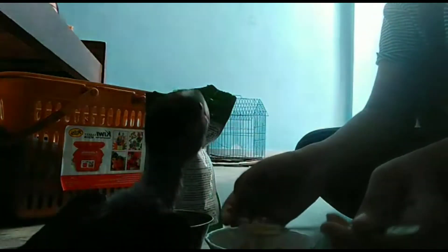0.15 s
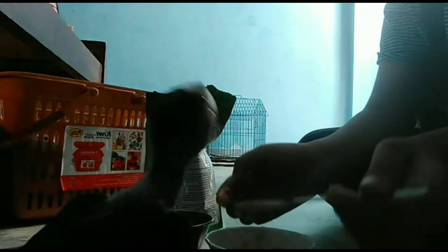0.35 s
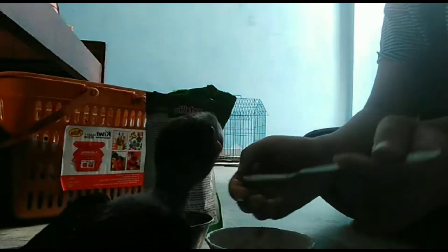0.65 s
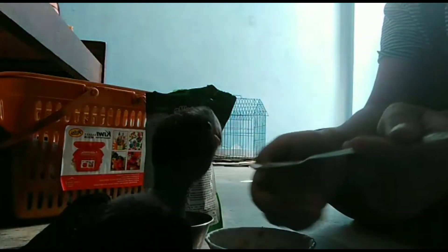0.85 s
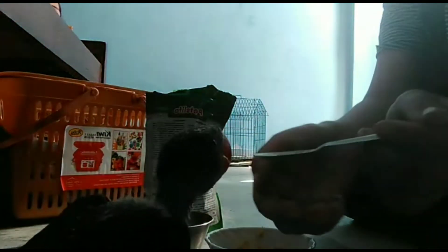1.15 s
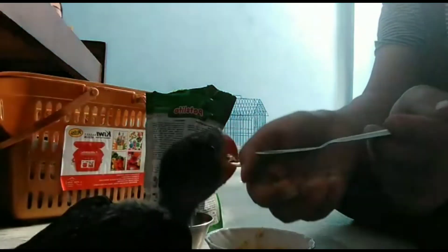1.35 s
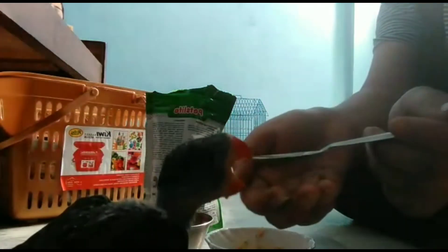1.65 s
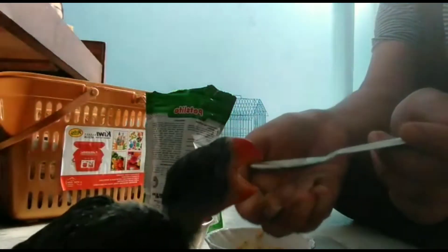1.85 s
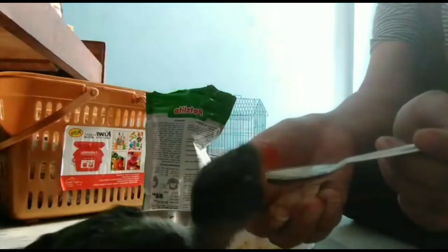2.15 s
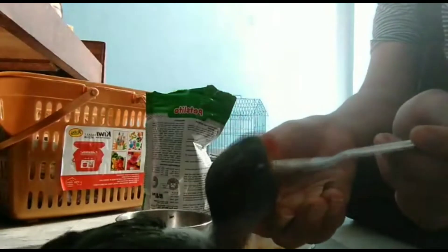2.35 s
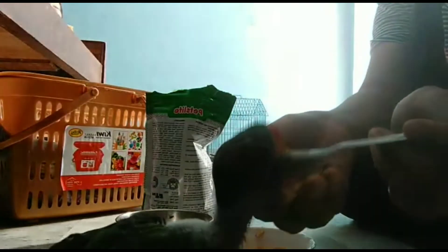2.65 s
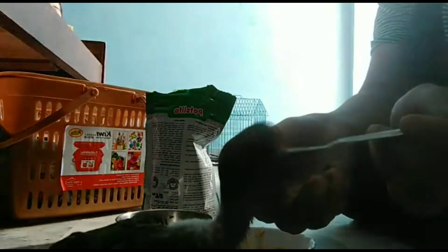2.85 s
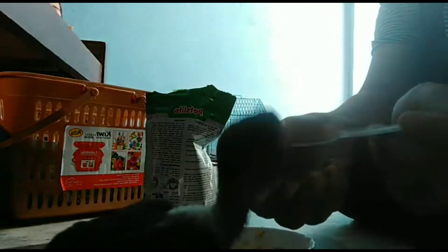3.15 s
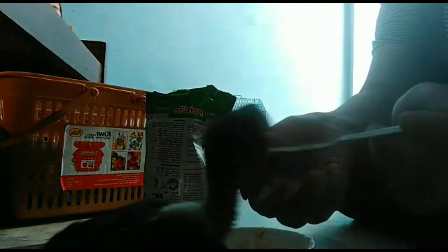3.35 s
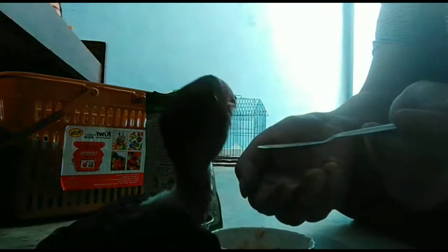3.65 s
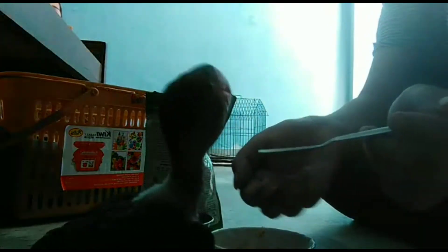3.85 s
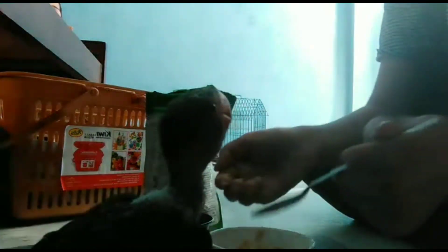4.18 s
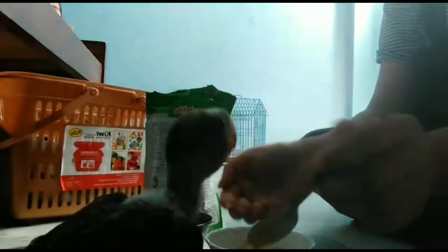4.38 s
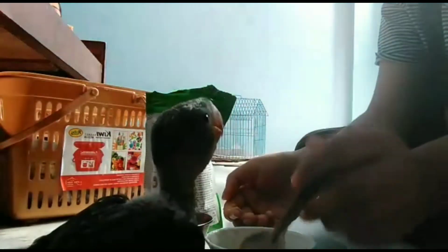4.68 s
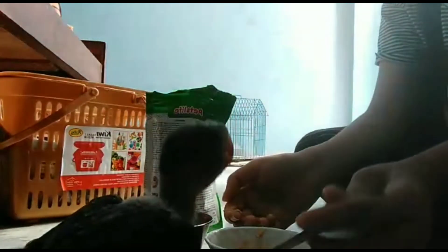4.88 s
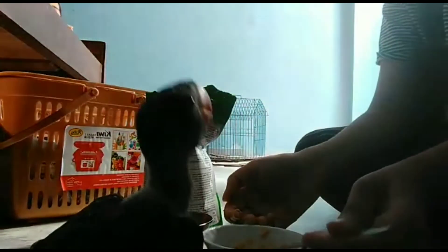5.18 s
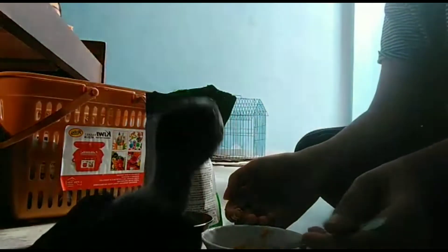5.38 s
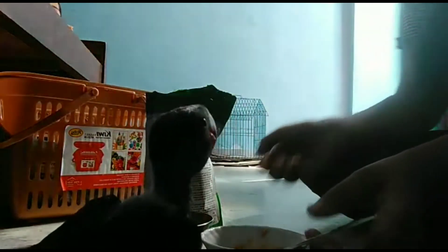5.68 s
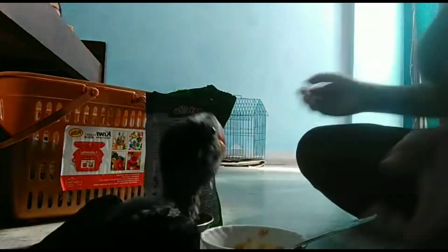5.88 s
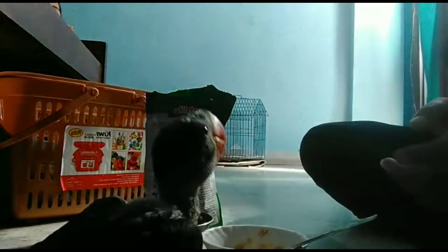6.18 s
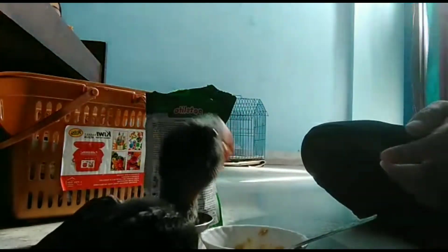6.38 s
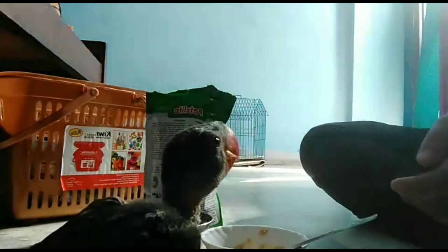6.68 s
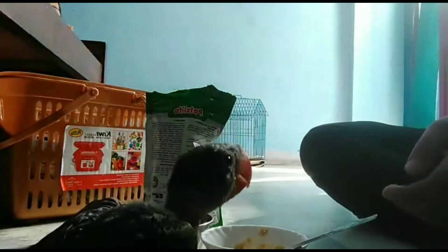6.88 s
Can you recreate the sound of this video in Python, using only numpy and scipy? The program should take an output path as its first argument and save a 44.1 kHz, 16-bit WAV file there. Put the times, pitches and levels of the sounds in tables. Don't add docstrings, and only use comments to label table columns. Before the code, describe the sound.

Hungry baby parrot squawks harshly at close range as a spoon clicks on its beak and rattles in a bowl, draught thumping the microphone.

```python
import sys
import numpy as np
from scipy import signal
from scipy.fft import rfft, irfft, next_fast_len
from scipy.io import wavfile
from scipy.ndimage import minimum_filter1d

SR = 44100
rng = np.random.default_rng(int(sys.argv[2]) if len(sys.argv) > 2 else 0)


def volts_from_decibels(level):
    exponent = np.asarray(level, float) / 20
    return 10 ** exponent


def wav_out(sig):
    wavfile.write(sys.argv[1], SR, np.round(np.clip(np.atleast_2d(sig).T, -1, 1) * 32767).astype(np.int16))


N = 310009

# time_s, pitch_hz
GLIDES = [
    [(0.0, 1064), (0.034, 1020), (0.06, 945), (0.075, 880)],
    [(1.69, 1350), (1.706, 1500), (1.722, 1601), (1.774, 1720), (1.849, 1581), (1.915, 1325), (1.945, 1223),
     (2.015, 1084), (2.07, 875)],
    [(5.158, 1350), (5.175, 1490), (5.189, 1556), (5.251, 1640), (5.302, 1546), (5.351, 1427),
     (5.425, 1191), (5.493, 1061), (5.54, 823)],
]
# end_s, deepest_dip_s
SQUAWK_TIMES = [(0.075, -0.09), (2.072, 1.903), (5.541, 5.382)]
# strength_db, hoarseness_db, brightness_db_per_octave, background_loss_db, hold_after_end_s
SQUAWKS = [
    (-0.5, 5, 0.9, -7, 0.01),
    (0.14, -3, 0.34, -25, 0.32),
    (-0.3, 1.5, -0.4, -14, 0.02),
]
# time_from_end_s, level_db, breath_re_tone_db, brightness_db_per_octave
EFFORT = [(-0.383, -36, -4, -9), (-0.374, -22.5, -12, -9), (-0.36, -17.5, -22, -1.5),
          (-0.344, -14.3, -32, 0.6), (-0.225, -16, -37, 0.2), (-0.158, -23, -24, -0.4),
          (-0.024, -17.5, -24.5, -1.1), (-0.017, -26, -11, -5), (-0.006, -30, -7, -6)]
# freq_hz, gain_db
THROATS = [
    [(1250, -12), (2450, -16), (3700, -6), (4900, -3), (5450, -10), (5800, -23), (6400, -15), (6800, -20),
     (7600, 3), (8500, -9), (9500, -21), (11000, -29), (14000, -35)],
    [(900, -14), (1700, -9), (2300, -15), (3300, -5.5), (4100, -8), (4950, -2), (5600, -10), (6200, -2.5),
     (6900, -11), (7450, -32), (8350, -2), (9500, -16), (10300, -23), (11200, -19), (12300, -35),
     (14000, -27)],
    [(900, -13), (1600, -7), (2400, -16), (3200, -3), (4100, -6), (4850, -2), (5700, -17), (6300, -3),
     (7000, -24), (7950, 3), (8700, -5), (9500, -17), (10100, -34), (11400, -25), (12500, -32),
     (14500, -29)],
]
# time_s, depth_hz, rasp_db
CATCHES = [(0.064, 40, 6), (1.748, 14, 6), (1.857, 14, 9), (1.901, 30, 12), (1.982, 10, 5), (2.064, 45, 8),
           (5.222, 12, 6), (5.302, 58, 15), (5.268, 3, 10), (5.341, 10, 9), (5.382, 24, 11), (5.422, 6, 7)]
TREMOR_PERIOD_S, TREMOR_DEPTH_HZ = .041, 11
SHUDDER_DEPTH_HZ, SHUDDER_LEAD_S, SHUDDER_SPREAD_S = 31, .02, .04
SLIP_S, REGAIN_S = .004, .008
BEAK_OPEN_HZ, BEAK_TOP_HZ = 1630, 6000
BEAK_CLOSING_POWER = .41
TOP_CUT_HZ = 15800

# time_s, peak_db, bowl_share_db, spoon_share_db, crack_re_ring_db
TICKS = [(2.982, -33.5, -41, -2, -8), (3.065, -44, -16, -1, -16), (3.101, -46, -16, 0, -16),
         (3.107, -46, -16, 0, -16), (3.1144, -33, -32, -12, -20), (3.121, -46, -20, 0, -20),
         (3.205, -40, -21, -3.5, -6), (3.2915, -19.5, -24.5, -8.5, 12), (3.4235, -51, -17, -2, 0),
         (3.488, -16.5, -21, -13, 9), (4.9345, -39, 1.5, -7, -22), (4.9696, -34, -4, -25, -8),
         (5.1265, -35.5, 8.5, -14, -14.5), (5.682, -27, -1.5, -24, -12), (5.697, -34.5, 5, -10, -10),
         (5.7324, -27, -5, -10, -6), (5.7436, -16, -7, -22, -14), (5.7648, -26, -8, -11, 4),
         (6.0715, -38, -15, -20, 3)]
# freq_hz, level_db, t60_s
BOWL_MODES = [(1950, -4, .025), (3040, 0, 0.035), (2960, 0, 0.025), (4550, -12, 0.05), (5020, -13, 0.03),
              (5860, -8, .06), (7600, -3, 0.03), (7960, -6, .03)]
# freq_hz, level_db, t60_s
SPOON_MODES = [(8750, 0, .045), (9000, -4, .03), (9300, -6, .02), (11740, -7, .025), (13400, -9, .025),
               (15200, -14, .02)]
DULL_CRACK_HZ, BRIGHT_CRACK_HZ = (3200, 7000), (7200, 11000)
CRACK_EDGE_DB = -24

# peak_s, level_db,
# rise_s_per_20db, fall_s_per_20db, dull_part_db
RUSTLES = [(1.055, -72, .004, .15, 12), (1.082, -63, .004, .15, 8.5), (1.113, -47, .007, 0.0753, 1.5),
           (5.686, -49, .003, .045, 5), (5.742, -43.5, .004, .05, 4), (5.81, -52.5, 0.043, 0.16, -4),
           (5.98, -54.5, 0.087, 0.23, -19), (6.08, -53, 0.11, 0.09, -3.5), (6.18, -58, 0.15, 0.15, -13),
           (6.5, -71, .2, .15, -10), (5.6, -56, .1, 0.14, 5)]
# peak_s, level_db, rise_s_per_20db, fall_s_per_20db, dull_part_db
SCRAPES = [(4.937, -61, .004, .15, 5.5), (4.975, -49.5, .015, .06, -9.5), (5.075, -49, 0.029, .1, 2.5),
           (5.128, -43, 0.063, .04, 4), (5.158, -37, 0.015, .012, -16)]
# freq_hz, density_db_per_hz
RUSTLE_DULL = [(2500, -47), (3200, -4), (3620, -1), (3900, -9), (4250, 3), (4700, -8), (5220, 2),
               (5800, -9), (6500, 3), (7500, -40)]
SCRAPE_DULL = [(2200, -32), (3000, 12), (3500, -9), (4400, -6), (5000, 9), (5400, -8), (5800, 11),
               (6500, -16), (7500, -42)]
FRICTION_BODY = [(5500, -67), (6800, -10), (7800, -0.5), (9000, -4.5), (10300, -15.5), (12500, -55)]
FRICTION_TOP = [(9000, -52), (10500, 0), (13000, -6), (15500, 0)]
TOP_DB = -8
DULL_SLOPE, TOP_SLOPE = 0.97, 1.05

# peak_s, rumble_db, flutter_re_rumble_db, fall_s_per_20db
GUSTS = [(0.18, -36.5, -17, .2), (0.655, -26, -6.5, 0.07), (1.17, -25, -16, .12), (1.33, -23.5, -16.5, .07),
         (1.655, -34, -8, 0.1), (2.29, -32, -5, 0.12), (2.49, -34.5, -27, 0.27), (2.99, -38, 7, 0.23),
         (3.14, -37.5, 11.5, 0.12), (3.21, -30, 1.5, 0.11), (3.3, -26.5, -6.5, .07),
         (3.459, -38, 12.5, 0.14), (3.62, -32.5, -23, 0.02), (3.85, -32, 2, 0.08), (3.95, -27, 7.5, 0.16),
         (4.13, -29.5, 4.5, 0.1), (4.33, -32.5, -7.5, 0.13), (4.84, -31.5, -6.5, 0.11),
         (4.97, -28, -22, 0.02), (5.14, -32, -3.5, 0.17), (5.54, -17.5, -9.5, 0.06),
         (5.67, -24, -7.5, 0.19), (5.905, -23, -4.5, 0.06), (5.97, -29, -8.5, .08),
         (6.23, -29.5, -5.5, .08), (6.32, -36.5, -7, 0), (6.5, -27, -4, 0.1), (6.75, -33, -5, 0),
         (6.86, -36, 4, 0.27), (6.98, -25, -9.5, 0.08)]
# freq_hz, density_db_per_hz
RUMBLE_COLOUR = [(25, -24), (50, -6.5), (75, 7), (105, 8), (140, -1.5), (180, -10.5), (260, -57),
                 (800, -100)]
FLUTTER_COLOUR = [(40, -59), (90, -32.5), (160, 3), (250, -0.5), (400, -11), (600, -19.5), (900, -60),
                  (2500, -100)]
# start_s, peak_db, freq_hz, length_cycles
BUFFETS = [(0.142, -15, 84.5, 2.2), (0.618, -11.5, 109, 4.6), (1.149, -40, 96.9, 2.5),
           (1.3, -28, 88.8, 3.4), (1.576, -16.5, 86, 2.7), (1.92, -22, 80, 5), (2.267, -18.5, 83, 3.1),
           (2.475, -24, 113.3, 2.4), (3.132, -5.5, 129, 2.5), (3.184, -3.5, 124, 4.1), (3.292, -7, 91, 2.9),
           (3.894, -10, 121, 3.6), (3.948, -7, 121, 3.1), (3.977, -15, 146, 4.4), (4.061, -11, 185, 4.0),
           (4.15, -28, 73, 2.5), (4.314, -13, 87, 3), (4.82, -16, 119, 3.6), (5.52, -9, 90.5, 2.3),
           (5.646, -3.5, 125, 2.9), (5.89, -9.5, 102, 2.6), (5.95, -15, 124, 3.9), (6.189, -13.5, 142, 7.1),
           (6.486, -16, 83, 3.5), (6.793, -9.5, 99, 3.1)]
# start_s, peak_db, freq_hz, length_cycles
POPS = [(1.483, -12, 700, 1.2), (2.289, -30, 500, 1.2), (3.948, -1.5, 320, 1.24), (4.057, -4.5, 202, 1.2),
        (4.0575, -9, 520, 1.2)]
# start_s, peak_db, freq_hz, length_cycles
KNOCKS = [(4.9362, -14.5, 1920, 9.3), (4.969, -27, 7800, 35), (5.0, -33, 7800, 70), (5.037, -35, 5100, 50),
          (5.087, -25, 3050, 55), (5.126, -12, 4960, 18), (5.126, -18, 3050, 15), (5.683, -23, 3040, 40),
          (5.699, -19, 3040, 30), (5.686, -28, 5860, 170), (5.744, -8, 2960, 30)]
STILL_RUMBLE_DB, STILL_FLUTTER_DB = -46, -55
GUST_RISE_RE_FALL = .8

# freq_hz, density_db_per_hz
AIR_COLOUR = [(200, -16.5), (300, -6), (490, -1.5), (600, -7), (1060, -7.5), (1150, -16.5), (1550, -17),
              (1900, -10), (2600, -20.5), (2900, -32), (3500, -47), (4100, -33), (4800, -48.5),
              (10500, -61)]
# time_s, level_db, weak_band_db
AIR_LEVEL = [(0.0, -50.5, 3.5), (1.5, -51, 4), (2.5, -51, -3), (3.6, -50.5, -0.5), (4.4, -52, -2.5),
             (5.1, -50, 2), (6, -51.5, -3), (7.03, -52, -2.5)]
# freq_hz, t60_s, level_db
WHINES = [(3380, 0.018, -84), (3925, 0.01, -76.5), (4820, .025, -93.5), (6560, .025, -90.5),
          (7700, .02, -82), (8500, .02, -98)]

# freq_hz, t60_s
ROOM_T60 = [(800, .15), (1500, .26), (2500, .3), (6000, .26), (9000, .23), (12000, .18), (15000, .12)]
ROOM_DB, TABLE_ECHO_S, TABLE_ECHO_DB = -9, .0017, -17

# freq_hz, share
AIR_DUCK_SHARE = [(250, 0.67), (500, 0.85), (800, .42), (1400, 0.92), (2100, 0.27), (4600, .5)]
DRAUGHT_DUCK_SHARE = .45
DUCK_DELAY_S, DUCK_ATTACK_S, RECOVER_DB_PER_S = .02, .06, 280
DUCK_LOUD_FACTOR = 1.8


def chick(waver_db=3.6, jitter=.001, dip_db_per_hz=.04):
    out = np.zeros(N)
    for glide, (end_s, deepest_s), voice, throat in zip(GLIDES, SQUAWK_TIMES, SQUAWKS, THROATS):
        effort = np.array(EFFORT) + [end_s, *voice[:3]]
        fade = during(effort, fade_s=.002)
        on = fade > 0
        count = on.sum()
        t = np.flatnonzero(on) / SR
        dip_hz, rasp_db = pitch_dips(t, deepest_s)
        pitch_hz = in_time(glide)[0][on] - dip_hz
        phase = 2 * np.pi * np.cumsum(pitch_hz * (1 + jitter * drift(120, count))) / SR
        level_db, breath_db, tilt_db = (column[on] for column in in_time(effort))
        tone, power = 0, 0
        for k in range(1, 19):
            partial_hz = k * pitch_hz
            closing = BEAK_CLOSING_POWER * np.clip((BEAK_TOP_HZ - partial_hz) / 2000, 0, 1)
            throat_db = at_hz(throat, partial_hz * (BEAK_OPEN_HZ / pitch_hz) ** closing)
            gain = volts_from_decibels(throat_db + tilt_db * np.log2(k) + waver_db * drift(22, count))
            gain = gain * (partial_hz < TOP_CUT_HZ)
            tone = tone + gain * np.cos(k * phase + rng.uniform(0, 2 * np.pi))
            power = power + gain ** 2 / 2
        tone = tone / np.sqrt(power)
        breath_colour = np.array([(550, -70), *throat]) * [1, .75]
        breath = volts_from_decibels(np.minimum(breath_db + rasp_db, -3)) * noise(breath_colour)[on]
        level = volts_from_decibels(level_db - dip_db_per_hz * dip_hz + drift(35, count)) * fade[on]
        out[on] += level * (tone + breath)
    return out


def pitch_dips(t, deepest_s):
    shudder = np.exp(-.5 * ((t - deepest_s + SHUDDER_LEAD_S) / SHUDDER_SPREAD_S) ** 2)
    depth_hz = TREMOR_DEPTH_HZ + SHUDDER_DEPTH_HZ * shudder
    caught = np.array([np.exp(-.5 * ((t - s) / np.where(t < s, SLIP_S, REGAIN_S)) ** 2)
                       for s, *_ in CATCHES])
    _, slip_hz, rasp_db = np.transpose(CATCHES) @ caught
    return depth_hz * np.cos(2 * np.pi * (t - deepest_s) / TREMOR_PERIOD_S) + slip_hz, rasp_db


def spoon(crack_s=.0009, rattle_s=.007):
    time_s, peak_db, bowl_db, spoon_db, crack_db = np.transpose(TICKS)
    at = np.round(time_s * SR).astype(int)
    out = np.zeros(N)
    white = rng.standard_normal(N)
    for modes, band_hz, share_db in ((BOWL_MODES, DULL_CRACK_HZ, bowl_db),
                                     (SPOON_MODES, BRIGHT_CRACK_HZ, spoon_db)):
        clicks = np.full(N, 1e-18)
        clicks[at] = volts_from_decibels(peak_db + share_db + crack_db + 8.5)
        crack = decay(clicks, crack_s) * white
        out += signal.sosfilt(signal.butter(3, band_hz, "band", fs=SR, output="sos"), crack)
        out += volts_from_decibels(CRACK_EDGE_DB) * np.diff(crack, prepend=0)
        spread_db = rng.normal(0, 3.2, (len(at), len(modes)))
        for k, (hz, level_db, t60_s) in enumerate(modes):
            clicks[at] = volts_from_decibels(peak_db + share_db + level_db - 28 + spread_db[:, k])
            out += ring(decay(clicks, rattle_s) * white, hz, t60_s)
    return out


def rustles(grain_db=2.0):
    out = np.zeros(N)
    body = noise(FRICTION_BODY) * volts_from_decibels(grain_db * drift(25))
    top = noise(FRICTION_TOP) * volts_from_decibels(grain_db * drift(25))
    for rows, colour in ((RUSTLES, RUSTLE_DULL), (SCRAPES, SCRAPE_DULL)):
        strokes = [(db, swell(s, rise, fall), dull_db) for s, db, rise, fall, dull_db in rows]
        body_level = sum(volts_from_decibels(db + shape) for db, shape, _ in strokes)
        top_level = sum(volts_from_decibels(db + TOP_DB + TOP_SLOPE * shape) for db, shape, _ in strokes)
        dull_level = sum(volts_from_decibels(db + dull_db + DULL_SLOPE * shape) for db, shape, dull_db in strokes)
        dull = noise(colour) * volts_from_decibels(grain_db * drift(15))
        out += fill(body_level) * body + fill(top_level) * top + fill(dull_level) * dull
    return out * volts_from_decibels(.6 * grain_db * drift(90))


def draught(lumpy_db=1.5):
    shapes = [swell(s, GUST_RISE_RE_FALL * fall, fall) + db for s, db, _, fall in GUSTS]
    loss_db = DRAUGHT_DUCK_SHARE * ducking()
    rumble = fill(volts_from_decibels(STILL_RUMBLE_DB) + sum(volts_from_decibels(shape) for shape in shapes))
    flutter = fill(volts_from_decibels(STILL_FLUTTER_DB) + sum(volts_from_decibels(shape + row[2]) for shape, row in zip(shapes, GUSTS)))
    lumps = drift(15)
    flutter_lumps = 0.59 * lumps + drift(23)
    out = rumble * volts_from_decibels(loss_db - 0.8 + lumpy_db * lumps) * noise(RUMBLE_COLOUR)
    out += flutter * volts_from_decibels(loss_db - 6 + lumpy_db * flutter_lumps) * noise(FLUTTER_COLOUR)
    for start_s, peak_db, hz, cycles in [*BUFFETS, *POPS, *KNOCKS]:
        turn = np.arange(int(cycles * SR / hz)) * hz / SR
        i = int(start_s * SR)
        window = np.sin(np.pi * turn / cycles) ** 2
        out[i:i + len(turn)] += volts_from_decibels(peak_db - 11) * window * np.sin(2 * np.pi * turn)
    return out


def air(patchy_db=3.0, high_patchy_db=2.5, whine_patchy_db=2.5):
    loss_db = ducking()
    level_db, weak_db = in_time(AIR_LEVEL)
    size = next_fast_len(N)
    spectrum = rfft(volts_from_decibels(9.5) * noise(AIR_COLOUR), size)
    out = 0
    for hz, share in bands(size, 250, 4650, count=20):
        swell_db = patchy_db * drift(3.3) if hz < 2800 else high_patchy_db * drift(20)
        is_weak = 1150 < hz < 1700 or 2400 < hz < 3200
        gain_db = swell_db + weak_db * is_weak + at_hz(AIR_DUCK_SHARE, hz) * loss_db
        out = out + volts_from_decibels(gain_db) * irfft(spectrum * share, size)[:N]
    white = rng.standard_normal(N)
    for hz, t60_s, band_db in WHINES:
        band = rms_one(ring(ring(ring(white, hz, t60_s), hz, t60_s), hz, t60_s))
        gain_db = band_db + 52.5 + AIR_DUCK_SHARE[-1][1] * loss_db + whine_patchy_db * drift(10)
        out += volts_from_decibels(gain_db) * band
    return volts_from_decibels(level_db) * out


def room(x, onset_s=.003):
    t = np.arange(SR // 2) / SR
    white = rfft(rng.standard_normal(len(t)))
    tail = sum(irfft(white * share, len(t)) * volts_from_decibels(-60 * t / at_hz(ROOM_T60, hz))
               for hz, share in bands(len(t), 800, 15000, count=8))
    response = volts_from_decibels(ROOM_DB) * tail * (t > onset_s) / np.sqrt(np.sum(tail ** 2))
    response[0] += 1
    response[int(TABLE_ECHO_S * SR)] += volts_from_decibels(TABLE_ECHO_DB)
    return signal.fftconvolve(x, response)[:N]


def ducking():
    rows = [(-1, 0)]
    for (end_s, _), (*_, loss_db, hold_s) in zip(SQUAWK_TIMES, SQUAWKS):
        start_s = end_s + EFFORT[0][0] + DUCK_DELAY_S
        release_s = end_s + hold_s
        loud_db = DUCK_LOUD_FACTOR * loss_db
        rows += [(start_s, 0), (start_s + DUCK_ATTACK_S, loud_db), (end_s - .12, loud_db),
                 (end_s - .05, loss_db), (release_s, loss_db),
                 (release_s - loss_db / RECOVER_DB_PER_S, 0)]
    return in_time(rows)[0]


def suppress(x, under_db=-25, gate_db=-108, reach_hz=700, from_hz=1100):
    hz, _, cells = signal.stft(x, SR, nperseg=512, noverlap=384)
    power = np.abs(cells) ** 2 + 1e-20
    strongest = -minimum_filter1d(-power, size=2 * int(reach_hz / hz[1]) + 1, axis=0)
    threshold = strongest * volts_from_decibels(2 * under_db) + volts_from_decibels(2 * gate_db)
    keep = np.where(hz[:, None] > from_hz, power / (power + threshold), 1)
    return signal.istft(cells * keep, SR, nperseg=512, noverlap=384)[1][:N]


def in_time(rows):
    s, *columns = np.transpose(rows)
    return [np.interp(np.arange(N) / SR, s, column) for column in columns]


def during(rows, fade_s):
    t = np.arange(N) / SR
    fade_in = np.clip((t - rows[0][0]) / fade_s + 1, 0, 1)
    return fade_in * np.clip((rows[-1][0] - t) / fade_s + 1, 0, 1)


def at_hz(points, hz):
    return np.interp(np.log(hz), np.log(np.array(points)[:, 0]), np.array(points)[:, 1])


def rms_one(x):
    return x / np.sqrt(np.mean(x ** 2) + 1e-20)


def drift(rate_hz, count=N):
    r = np.exp(-32 * np.pi * rate_hz / SR)
    slow = signal.lfilter([1], [1, -2 * r, r * r], rng.standard_normal(count // 16 + 1002))[1000:]
    return np.interp(np.arange(count) / 16, np.arange(len(slow)), rms_one(slow))


def noise(spectrum):
    size = next_fast_len(N)
    hz = np.maximum(np.fft.rfftfreq(size, 1 / SR), 1)
    return rms_one(irfft(rfft(rng.standard_normal(size)) * volts_from_decibels(at_hz(spectrum, hz)), size)[:N])


def decay(clicks, time_s):
    return signal.lfilter([1], [1, -np.exp(-1 / (time_s * SR))], clicks)


def ring(clicks, hz, t60_s):
    r, w = volts_from_decibels(-60 / (t60_s * SR)), 2 * np.pi * hz / SR
    return signal.lfilter([0, np.sin(w)], [1, -2 * r * np.cos(w), r * r], clicks + 1e-18)


def bands(size, low_hz, high_hz, count):
    hz = np.clip(np.fft.rfftfreq(size, 1 / SR), low_hz, high_hz)
    place = np.log(hz / low_hz) / np.log(high_hz / low_hz)
    shares = [np.clip(1 - abs(place * (count - 1) - k), 0, 1) for k in range(count)]
    return zip(np.geomspace(low_hz, high_hz, count), shares)


def swell(peak_s, rise_s, fall_s):
    t = np.arange(0, N + 32, 32) / SR - peak_s
    return -20 * np.where(t < 0, -t / rise_s, t / fall_s)


def fill(coarse):
    return np.interp(np.arange(N) / 32, np.arange(len(coarse)), coarse)


def scene():
    return (room(chick() + spoon()) + rustles() + draught() + air())[None]


def band_limit(x):
    return signal.sosfilt(signal.butter(12, 16640, fs=SR, output="sos"), x)


def record(dry):
    limited = np.tanh(suppress(dry[0])[None])
    top_cut = signal.cheby2(12, 60, 1.04 * TOP_CUT_HZ, fs=SR, output="sos")
    mix = signal.sosfilt(top_cut, limited)
    return band_limit(mix)


dry = scene()
out = record(dry)
wav_out(out)
```